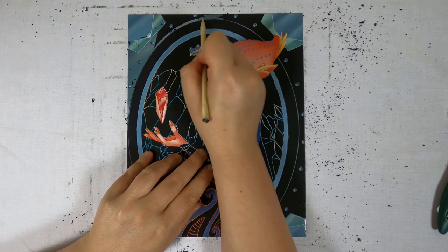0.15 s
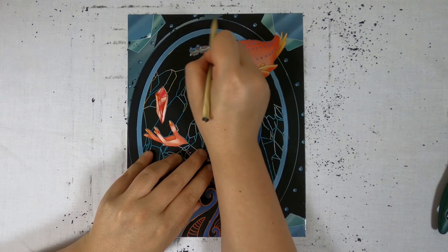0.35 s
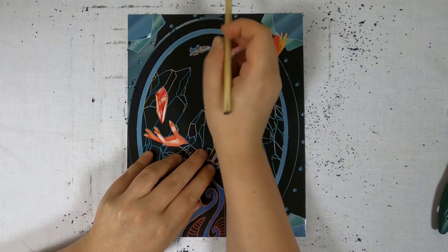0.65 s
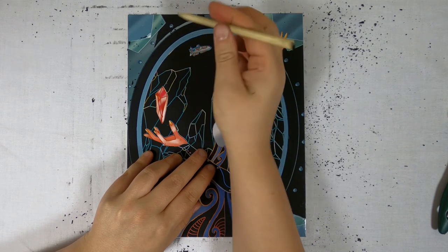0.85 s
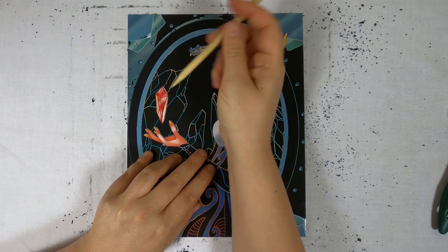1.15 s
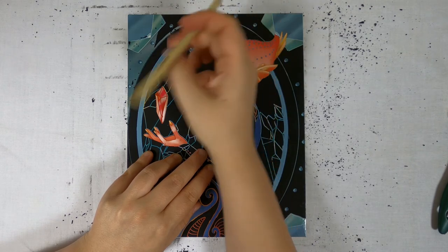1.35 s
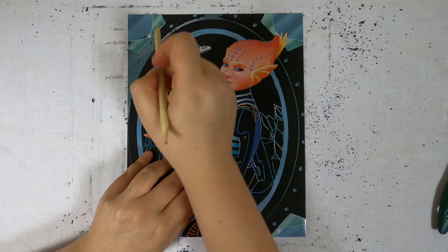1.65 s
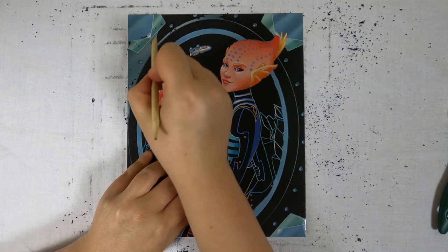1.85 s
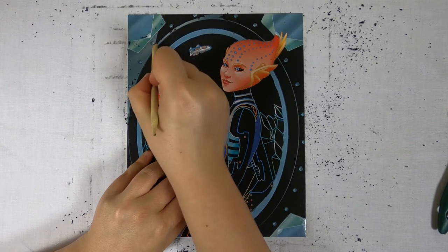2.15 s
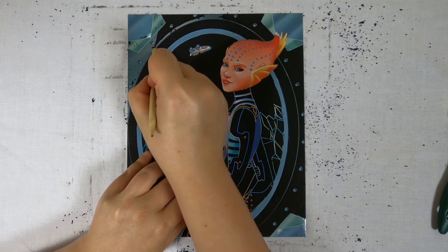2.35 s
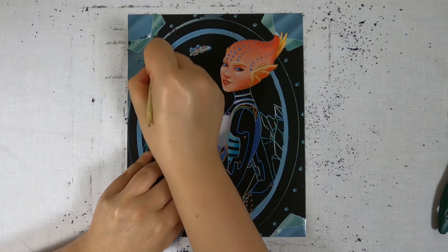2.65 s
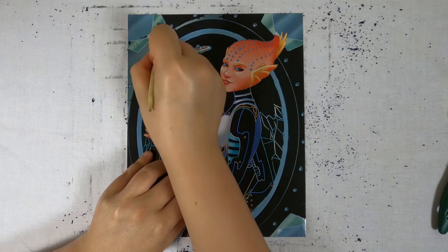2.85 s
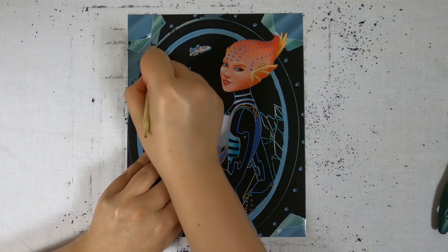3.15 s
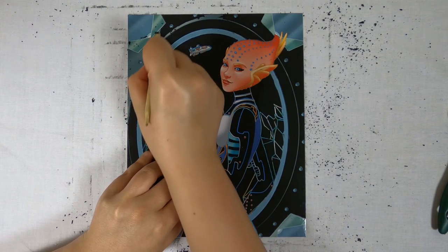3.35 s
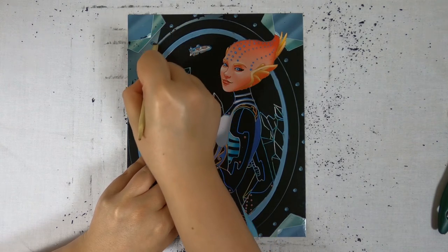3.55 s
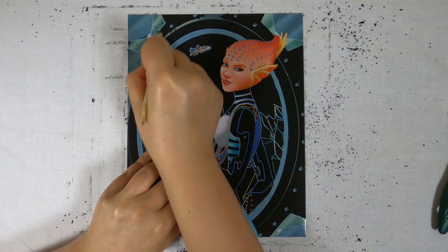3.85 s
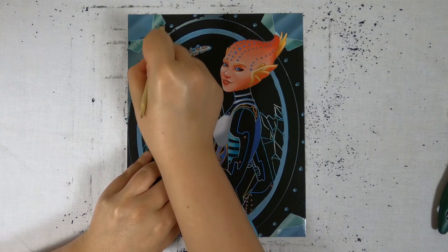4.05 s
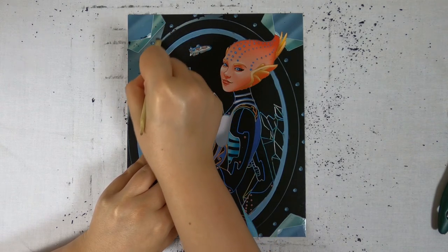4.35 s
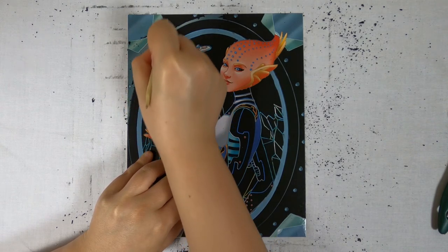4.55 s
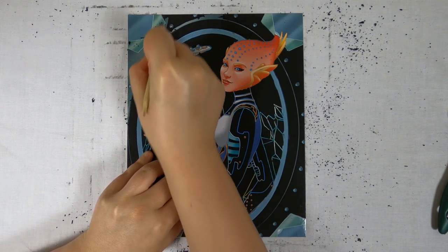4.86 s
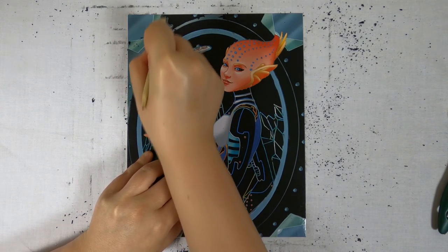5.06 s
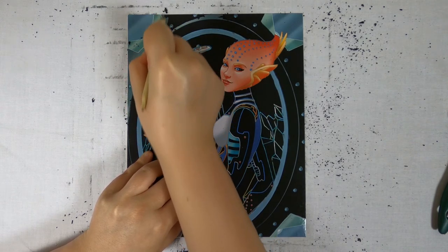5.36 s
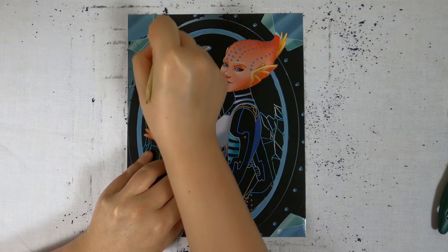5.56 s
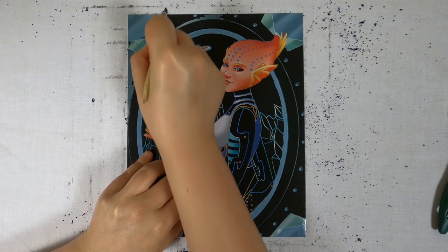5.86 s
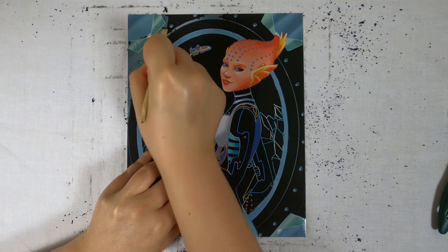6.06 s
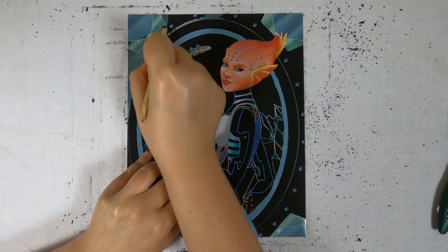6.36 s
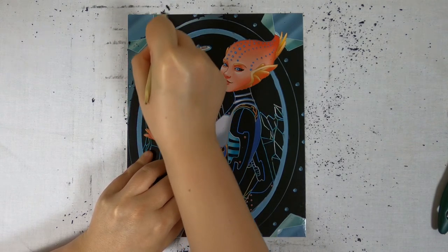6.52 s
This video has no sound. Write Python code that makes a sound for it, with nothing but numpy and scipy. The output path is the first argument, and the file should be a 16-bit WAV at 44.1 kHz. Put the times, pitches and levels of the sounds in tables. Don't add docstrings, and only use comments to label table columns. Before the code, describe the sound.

A hand scratches coating from a card on a table, heard close up in stereo with little reverberation. Weak dry scratches come first, then a near-silent pause with small slipping clicks from the fingers. Three longer, crunchy scrapes burst out with woody table rumble, separated by faint hissing slides. The rhythm then quickens into short to-and-fro scratches with several soft thuds. Faint building rumble lies beneath.

```python
import sys
import numpy as np
from scipy import signal
from scipy.fft import rfft, irfft, next_fast_len
from scipy.io import wavfile
from scipy.ndimage import uniform_filter1d

SR = 44100
rng = np.random.default_rng(int(sys.argv[2]) if len(sys.argv) > 2 else 0)


def to_wav(sig):
    pcm = np.clip(np.atleast_2d(sig), -1, 1) * 32767
    pcm = np.round(pcm).astype(np.int16)
    wavfile.write(sys.argv[1], SR, pcm.T)


def makeup_ratio(level_db):
    decades = np.asarray(level_db, float) / 20
    return 10 ** decades


N = 295029
TIME_S = np.arange(N) / SR
FIRST_PASSES = TIME_S < 1


def rms_one(x):
    return x / np.sqrt(np.mean(x ** 2) + 1e-20)


def filtered(x, order, hz, kind="low"):
    return signal.sosfilt(signal.butter(order, hz, kind, fs=SR, output="sos"), x)


def drift(rate_hz):
    r = np.exp(-80 * np.pi * rate_hz / SR)
    slow = signal.lfilter([1], [1, -2 * r, r * r], rng.standard_normal(N // 40 + 2002))[2000:]
    return np.interp(np.arange(N) / 40, np.arange(len(slow)), rms_one(slow))


def grains(per_s, spread_db):
    sizes = makeup_ratio(spread_db * np.minimum(rng.exponential(1, N), 4)) * rng.choice([-1, 1], N)
    return rms_one(sizes * (rng.random(N) < per_s / SR))


def at_hz(points, hz):
    point_hz, values = np.transpose(points)
    return np.interp(np.log(hz), np.log(point_hz), values)


def coloured(pair, spectrum, likeness, low_hz):
    size = next_fast_len(N)
    hz = np.maximum(np.fft.rfftfreq(size, 1 / SR), 1)
    gain = makeup_ratio(at_hz(spectrum, hz))
    gain = gain / np.sqrt(np.mean(gain ** 2 * (hz > low_hz)))
    alike = np.clip(at_hz(likeness, hz), 0, 1)
    mid, side = rfft(pair, size) * np.sqrt([1 + alike, 1 - alike]) * gain / np.sqrt(2)
    return irfft(np.array([mid + side, mid - side]), size)[:, :N]


def passes(start_s, end_s, start_db, end_db, rise_db_per_s, fall_db_per_s):
    t, depth_db = np.arange(0, N + 32, 32) / SR, 90
    shapes = []
    for s, e, a, b in zip(start_s, end_s, start_db, end_db):
        corners_s = [s - depth_db / rise_db_per_s, s, e + 1e-4, e + depth_db / fall_db_per_s]
        shapes.append(np.interp(t, corners_s, [a - depth_db, a, b, b - depth_db]))
    return np.interp(TIME_S, t, makeup_ratio(np.max(shapes, axis=0)))


def body(force, level, modes, wander_db, upper_db=0):
    out, power = np.zeros((2, N)), 0
    for k, (hz, width_hz, db, pan_db) in enumerate(modes):
        r, w = np.exp(-np.pi * width_hz / SR), 2 * np.pi * hz / SR
        fed_db = db + upper_db * (hz > 400) + wander_db * drift(45)
        fed = force * level * makeup_ratio(fed_db) + 1e-18
        ring = signal.lfilter([(1 - r * r) / 2, 0, (r * r - 1) / 2], [1, -2 * r * np.cos(w), r * r], fed)
        out += (-1) ** k * ring * makeup_ratio([[pan_db / 2], [-pan_db / 2]])
        power += makeup_ratio(2 * db) * width_hz * np.pi / SR
    return out / np.sqrt(power)


# pitch_hz, density_db [dB per Hz]
ROOM_AIR = [(41, -34), (70, -6), (96, -29), (144, 2), (185, 2), (599, -13), (821, -15.5), (1260, -12),
            (1510, -15.5), (3040, -24), (6130, -31), (12900, -37.5), (15500, -40)]
# pitch_hz, density_db [dB per Hz]
BUILDING_RUMBLE = [(12, -23.5), (26, 4.5), (40, -4), (60, -13.5), (100, -52), (300, -105)]
# pitch_hz, likeness [0-1]
ROOM_LIKENESS = [(25, 0.53), (60, 0.75), (130, 0.36), (300, 0.014), (15000, 0.033)]
# peak_s, level_db
RUMBLE_SWELLS = [(0.61, -71), (1.21, -71.5), (2.0, -67), (2.4, -71.5), (2.98, -66.5), (3.45, -71),
                 (4.06, -76), (4.8, -76), (5.14, -70), (5.83, -66.5), (6.32, -73), (6.69, -77)]
# pitch_hz, level_db
ELECTRONIC_WHINES = [(9400, -112), (13168, -112)]


def hush():
    air = makeup_ratio(-68) * coloured(rng.standard_normal((2, N)), ROOM_AIR, ROOM_LIKENESS, low_hz=100)
    air[0] = np.roll(air[0], shift=2)
    s, db = np.transpose(RUMBLE_SWELLS)
    swell = passes(s, s, db, db, rise_db_per_s=35, fall_db_per_s=35)
    rumble = swell * coloured(rng.standard_normal((2, N)), BUILDING_RUMBLE, ROOM_LIKENESS, low_hz=0)
    whine = sum(makeup_ratio(db + 8) * np.sin(2 * np.pi * hz * TIME_S) for hz, db in ELECTRONIC_WHINES)
    return air + rumble + whine


# start_s, hold_s, upper_mode_db, top_over_upper_db
FINGER_SLIPS = [
    (0.713, .015, -72.5, -3.5),
    (0.806, 0.023, -71, -18),
    (0.9, .01, -76, -22),
    (1.066, 0.013, -73, -10),
    (1.242, .002, -68.5, -7),
    (1.451, 0.0078, -68, -5),
    (1.519, 0.0018, -58.5, -6),
    (1.627, .03, -84, 7),
    (1.709, .008, -69, -10),
    (1.782, 0.028, -69, -7.5),
]
# start_s, end_s, start_db, end_db
SKIN_RUSTLES = [
    (0.597, 0.881, -84, -71),
    (.92, 1.064, -85, -76),
    (1.24, 1.27, -80, -84),
    (1.445, 1.528, -79, -77),
    (1.6, 1.635, -84, -75.5),
    (1.674, 1.708, -78.5, -75),
    (1.772, 1.8, -78.5, -74.5),
    (1.86, 1.993, -84.5, -86),
]
# pitch_hz, density_db [dB per Hz]
SKIN_NOISE = [(1000, -4), (2000, -3), (3500, 1), (5000, -2.5), (9000, -8), (15000, -27)]
# pitch_hz, likeness [0-1]
HAND_LIKENESS = [(1000, 0.45), (4000, 0.27), (8000, 0.2), (14000, 0.14)]
# pitch_hz, width_hz, level_db, left_over_right_db
STYLUS_UPPER_MODES = [(6110, 220, 1.1, 0), (6560, 290, 4.4, 0)]
STYLUS_TOP_MODES = [(9460, 1900, -2.3, 0), (10100, 1040, 1, 0)]


def turning():
    s, hold, upper_db, top_db = np.transpose(FINGER_SLIPS)
    rates = 454, 800
    upper_gain = passes(s, s + hold, upper_db, upper_db, *rates)
    top_gain = passes(s, s + hold, upper_db + top_db, upper_db + top_db, *rates)
    slips = grains(3800, spread_db=-5.5) * makeup_ratio(0.82 * drift(64))
    upper = body(slips, upper_gain * makeup_ratio(-3.5), STYLUS_UPPER_MODES, wander_db=4.5)
    top = body(slips, top_gain * makeup_ratio(1.5), STYLUS_TOP_MODES, wander_db=4)
    skin = coloured(np.array([slips, rng.standard_normal(N)]), SKIN_NOISE, HAND_LIKENESS, low_hz=1500)
    rustle_gain = passes(*np.transpose(SKIN_RUSTLES), rise_db_per_s=250, fall_db_per_s=230)
    return upper + top + skin * makeup_ratio(2) * rustle_gain


# start_s, end_s, start_db, end_db
TIP_SKIMS = [
    (2.428, 2.458, -69.5, -78),
    (2.984, 3.082, -66, -68),
    (3.382, 3.436, -76, -78),
    (4.178, 4.248, -81, -83),
]
# pitch_hz, width_hz, level_db, left_over_right_db
SKIMMING_MODES = [(3630, 320, 0.5, 6), (1280, 83, 3, -2)]


def skimming():
    gain = passes(*np.transpose(TIP_SKIMS), rise_db_per_s=594, fall_db_per_s=382)
    return body(grains(8000, spread_db=2), gain, SKIMMING_MODES, wander_db=1)


# start_s, end_s, start_db, end_db
HAND_SLIDES = [(0.0, .054, -81.5, -74), (0.167, 0.179, -65.5, -63.5), (0.254, 0.338, -82.5, -77),
               (0.446, 0.484, -62, -67.5), (0.574, 0.603, -76, -82), (2.518, 2.607, -76, -86),
               (2.63, 2.83, -72, -62.5), (2.966, 3.11, -67, -71.5), (3.296, 3.428, -81.5, -71),
               (3.512, 3.612, -78, -75), (3.77, 3.833, -80.5, -73), (3.897, 4.024, -60.5, -71),
               (4.143, 4.253, -74, -71.5), (4.4, 4.447, -85, -69), (4.463, 4.627, -63, -62.5),
               (4.76, 4.827, -76.5, -69), (4.9, 4.967, -76, -67.5), (4.979, 4.983, -58.5, -55),
               (5.11, 5.173, -71, -69), (5.235, 5.312, -71, -69.5), (5.419, 5.473, -72.5, -68),
               (5.526, 5.614, -76.5, -62.5), (5.72, 5.794, -73.5, -72), (5.851, 5.928, -73, -63),
               (6.032, 6.104, -70.5, -70), (6.176, 6.28, -65.5, -71), (6.346, 6.408, -70.5, -65.5),
               (6.481, 6.557, -70.5, -67.5), (6.656, 6.69, -68, -71)]
# pitch_hz, density_db [dB per Hz]
SLIDE_HISS = [(1200, -8.5), (2200, -2), (3000, -8.5), (3650, -8), (4400, -3.5), (5800, -3.5), (7500, -5),
              (9500, -8), (9800, -13.5), (13000, -17), (15600, -28)]


def sliding():
    gain = passes(*np.transpose(HAND_SLIDES), rise_db_per_s=594, fall_db_per_s=382)
    rub = np.array([grains(12000, spread_db=3.5), rng.standard_normal(N)])
    hiss = coloured(rub, SLIDE_HISS, HAND_LIKENESS, low_hz=4870) * gain * makeup_ratio(drift(36) - 1.12)
    air = filtered(hiss, 2, 9600, "high")
    hiss = hiss + air * makeup_ratio(-2) * FIRST_PASSES
    shaded = filtered(hiss[0], 1, 9000)
    return np.array([shaded * makeup_ratio(2.5), hiss[1]])


# start_s, peak_db, first_pitch_hz, settled_pitch_hz
HEEL_KNOCKS = [
    (5.0055, -23, 180, 185),
    (5.3278, -36.5, 180, 134.3),
    (5.945, -26.5, 193, 133.2),
    (6.269, -34.5, 153, 143.5),
    (6.291, -34.5, 148, 132),
    (6.557, -57, 176, 140),
]


def knocks():
    out, t = np.zeros(N + SR), np.arange(SR // 2) / SR
    settle_s = 0.0076
    for s, db, hz, end_hz in HEEL_KNOCKS:
        turns = end_hz * t + (hz - end_hz) * settle_s * (1 - np.exp(-t / settle_s))
        rise = 1 - np.exp(-t / 0.0043)
        decay = makeup_ratio(-60 * t / 0.052) + 0.18 * makeup_ratio(-60 * t / 0.26)
        thump = np.sin(2 * np.pi * turns) * decay
        push = makeup_ratio(-22.5) * np.sin(2 * np.pi * 75 * t) * makeup_ratio(-60 * t / 0.21)
        out[round(s * SR) + 130:][:len(t)] += makeup_ratio(db - 0.5) * rise * (thump + push)
    return out[:N]


# start_s, crack_db, pitch_hz, blow_over_crack_db
TIP_TICKS = [(0.162, -59, 2940, 0), (0.4356, -44.5, 2960, -8), (0.5661, -63, 3650, -11),
             (0.6534, -60, 6600, 16), (0.6755, -64, 3560, -15), (0.969, -61, 3300, -11),
             (1.32, -62, 2980, -13), (1.518, -50, 6050, -23), (2.42, -43.5, 3920, 22.5),
             (2.565, -61, 3670, 10), (2.5945, -79, 3550, -1), (3.202, -59.5, 3440, 14),
             (3.7918, -58, 3000, 14), (3.8777, -43, 3550, 8), (3.89, -48, 2950, 18), (4.433, -62, 3540, 2),
             (4.476, -49.5, 2560, 8), (4.5965, -44, 2940, 1), (4.9834, -61, 3000, -1),
             (5.601, -46.5, 3400, 8), (5.9123, -54, 2530, 8), (6.159, -55, 3600, -8),
             (6.2594, -51, 2850, -3), (6.6547, -59, 6600, 7)]


def ticks():
    out, blows, t = np.zeros(N + SR), np.zeros(N), np.arange(1500) / SR
    for s, db, hz, blow_db in TIP_TICKS:
        start = round(s * SR) + 60
        ring = np.sin(2 * np.pi * hz * t) * (makeup_ratio(-60 * t / 0.012) + 0.19 * makeup_ratio(-60 * t / 0.1))
        crack = rng.standard_normal(1500) * makeup_ratio(-60 * t / 0.02)
        out[start:][:1500] += makeup_ratio(db - 4) * (ring + 0.5 * crack)
        blows[start] = makeup_ratio(db + blow_db - 8)
    dull = filtered(out[:N], 3, [1500, 9000], "band")
    return dull + body(blows, 1, CARD_MODES + TABLE_MODES[2:], wander_db=3)


# start_s, card_peak_db, table_peak_db, tip_peak_db
RIDGE_CATCHES = [(2.568, -53, -52, -62), (2.597, -46, -45, -58), (2.605, -57, -37.5, -65),
                 (2.632, -40, -33, -45), (2.667, -34, -30, -48), (2.693, -39, -27.5, -51),
                 (2.707, -34, -32, -50), (2.717, -30, -28.5, -48), (2.752, -38, -35, -42),
                 (2.769, -28, -33.5, -34), (2.776, -30, -35, -27.5), (2.797, -28, -40, -35),
                 (2.813, -45, -43.5, -27.5), (3.203, -69, -59, -56), (3.794, -43.5, -49, -56),
                 (3.832, -53, -36, -52), (3.869, -37, -28, -48), (3.883, -48, -29, -41),
                 (3.89, -26, -45, -42), (3.909, -33, -36, -43), (3.924, -23.5, -43, -42),
                 (3.941, -28, -36, -46), (3.966, -38, -35.5, -48), (3.992, -31.5, -47, -46),
                 (4.007, -40, -41, -31), (4.026, -34, -41, -51), (4.434, -54, -46, -53),
                 (4.457, -50, -51, -55), (4.478, -30, -42, -40), (4.506, -32.5, -40, -47),
                 (4.539, -25, -37, -48), (4.555, -41, -36, -47), (4.595, -27, -39, -42),
                 (4.619, -38, -34, -41), (4.644, -33, -31, -46), (4.668, -35.5, -37.5, -56),
                 (4.979, -35.5, -45, -55), (5.003, -35, -41, -50), (5.32, -55, -62, -66),
                 (5.332, -54, -43, -66), (5.601, -43, -49, -50), (5.635, -40, -40, -54),
                 (5.914, -41, -44.5, -47), (5.935, -37, -48, -53), (6.25, -48, -38.5, -52),
                 (6.264, -39, -45, -50), (6.276, -38, -43, -54), (6.564, -45, -60, -56),
                 (6.652, -48.5, -70, -58)]
# card_db, table_db, tip_db
CATCH_FORCES = [18, 19.5, 10.5]


def catching():
    s, *peak_db = np.transpose(RIDGE_CATCHES)
    jolts = np.zeros((3, N))
    jolts[:, np.round(s * SR).astype(int)] = makeup_ratio(np.array(peak_db) + np.array(CATCH_FORCES)[:, None])
    return jolts


# start_s, card_ring_db, boom_over_ring_db, bite_over_ring_db, upper_table_modes_db
PRESSED_STROKES = [
    [(2.51, -83.5, 12.5, -5, -3), (2.612, -55, 12, -17, -5), (2.654, -42.5, 7, -3.5, -6.5),
     (2.714, -43.5, 7, -4.5, -1), (2.765, -37.5, 1.5, -3, -2), (2.78, -39, -2.5, -9, 6.5),
     (2.815, -36.5, -10, -3.5, 5.5), (2.942, -90.5, 12.5, -10, -8)],
    [(3.75, -89, 9, -8, -4), (3.798, -51.5, 9, -6, 1), (3.864, -54.5, 8, -6, -5),
     (3.888, -32.5, -6, -9.5, 5.5), (3.914, -31.5, -15, -8, 0.1), (3.952, -35.5, 1, -11.5, -2),
     (3.964, -46, 4.5, -3, 8), (4.018, -39, 2.5, -6.5, 5), (4.09, -78.5, 17.5, -13, 0)],
    [(4.402, -99, 9, -11, -4), (4.43, -58, 12, -6, -12), (4.464, -49.5, 2.5, -2, 8),
     (4.492, -39.5, -11.5, -3.5, 8.5), (4.56, -38, -12, -4, 10.5), (4.608, -36.5, -11.5, -4.5, 2),
     (4.636, -41.5, -3, -2.5, 1.5), (4.668, -48, 4.5, -9.5, -4), (4.75, -88.5, 22.5, -13, -7)],
]


def long_strokes():
    s, *columns = np.transpose(np.concatenate(PRESSED_STROKES))
    down = sum((TIME_S >= rows[0][0]) & (TIME_S <= rows[-1][0]) for rows in PRESSED_STROKES) > 0
    return uniform_filter1d(down * 1., size=221), [np.interp(TIME_S, s, c) for c in columns]


# start_s, hold_s, card_ring_db, boom_over_ring_db, bite_over_ring_db
TIP_DIGS = [
    (0.162, 0.017, -55.5, -14, -4),
    (0.434, 0.037, -61.5, -8, 6),
    (4.98, 0.019, -41, -6, -3.5),
    (5.322, 0.0066, -59.5, -1.5, -14),
    (5.612, 0.016, -44.5, -2.5, -5),
    (5.913, 0.019, -42.5, -7, -7.5),
    (6.256, 0.0027, -46.5, -1, -1.5),
    (6.648, .002, -61.5, -30, -18),
]
# start_s, end_s, start_db, end_db, lean_to_table_db
TIP_GRAZES = [(0.0, 0.064, -73.5, -76, 12), (0.262, 0.307, -84.5, -76, 16), (2.439, 2.514, -72, -94, 14),
              (2.99, 3.14, -101, -79.5, -22), (3.187, 3.18, -84, -68, -9), (3.32, 3.417, -77.5, -69.5, 4.5),
              (3.558, 3.573, -84, -79, -6), (4.07, 4.18, -61.5, -94, 7.5), (4.754, 4.811, -75.5, -75.5, 6),
              (4.907, 4.96, -67.5, -59, 4.5), (5.087, 5.15, -64.5, -71, 3), (5.214, 5.326, -77, -62, 5),
              (5.364, 5.46, -74, -74.5, 2.5), (5.557, 5.582, -65, -61.5, 5.5), (5.72, 5.812, -69.5, -90, 7),
              (5.824, 5.9, -78.5, -63, 7), (5.998, 6.114, -62.5, -80, 4.5),
              (6.174, 6.248, -64.5, -60.5, 0.5), (6.325, 6.466, -60, -88, 6),
              (6.468, 6.564, -75.5, -59.5, -0.5), (6.614, 6.644, -78, -78, 10)]


def contact():
    touching, (ring_db, boom_db, bite_db, upper_db) = long_strokes()
    long = touching * makeup_ratio([ring_db, ring_db + boom_db, ring_db + bite_db])
    s, hold, db, boom, bite = np.transpose(TIP_DIGS)
    rates = 1511, 360
    digs = [passes(s, s + hold, db, db, *rates),
            passes(s, s + hold + 0.022, db + boom + 1.5, db + boom, *rates),
            passes(s, s + hold, db + bite, db + bite, *rates)]
    s, end, db, end_db, lean = np.transpose(TIP_GRAZES)
    graze_bite_db = -1.5 - 0.37 * lean
    grazes = [passes(s, end, db + more, end_db + more, rise_db_per_s=503, fall_db_per_s=408)
              for more in (0, lean, graze_bite_db)]
    return np.maximum(long, np.maximum(digs, grazes)), upper_db * touching


# pitch_hz, width_hz, level_db, left_over_right_db
TABLE_MODES = [(139, 33, -6.5, 3), (179.6, 37.4, -1.5, -1), (300.2, 22.3, 3.5, 2),
               (354.8, 35.5, -1.5, -3.5), (441.9, 16.3, 1, 0.5), (560.6, 16.5, -7, 5.5),
               (317, 310, -20, -8)]
CARD_MODES = [(649.6, 32, -13.5, 2), (728.4, 60, -11.5, 0.84), (805, 14, -10, 2.3), (929, 24, 2, 3),
              (967, 20, -4, 3), (1373, 30, -7, 2), (1100, 900, -26, 2), (1038.6, 35.6, -5, 1),
              (1203, 133, -12.5, 0.59), (1240, 29, -8, 3), (1657, 23, -13, 1.2)]
PRESSED_CARD_MODES = [(560, 110, -6, 1.7), (716, 160, -5, 2), (938, 150, 2.5, 3), (1093, 103, 3.5, 1.4),
                      (1322, 180, 1.5, 3.4), (1750, 340, -6.5, 1.5)]
CARD_EDGE_MODES = [(613, 240, 2.5, 0), (915, 130, -17, 0), (1165, 220, 9.5, 0), (1590, 127, 13, 0)]
TIP_MODES = [(1840, 69, -6, 10), (2028, 72, -6, 1.2), (2373, 95, -1.5, 3.5), (2940, 36, -5.5, 11),
             (3620, 340, -7, 2), (2900, 2400, -14.5, 2), (4740, 160, -13.5, 1), (5570, 300, -19.5, 1.8),
             (6070, 1440, -20, 0.96)]
TIP_EDGE_MODES = [(2130, 240, 3.5, 0), (2400, 120, 7.5, 0), (3000, 1200, -2.5, 0)]


def scraping():
    (level, boom, bite), upper_db = contact()
    to_card, to_table, to_tip = catching()
    chips = rms_one(grains(4200, spread_db=3) * makeup_ratio(1.4 * drift(120)))
    bite = bite * makeup_ratio(-2.5)
    inner = ~FIRST_PASSES
    force = chips * level * inner + to_card
    damped = 0.53 * ((TIME_S > 4.74) & (TIME_S < 6.62))
    card = body(force, np.sqrt(1 - damped), CARD_MODES, wander_db=1.62)
    card += body(force, np.sqrt(damped), PRESSED_CARD_MODES, wander_db=0.5)
    card += body(chips, level * FIRST_PASSES, CARD_EDGE_MODES, wander_db=2.5)
    table_force = chips * boom * makeup_ratio(-0.3) + to_table
    table = body(table_force, 0.96, TABLE_MODES, wander_db=1.1, upper_db=upper_db)
    tip = body(chips * bite * inner + to_tip, 0.96, TIP_MODES, wander_db=1.86)
    tip += body(chips, bite * FIRST_PASSES, TIP_EDGE_MODES, wander_db=-2)
    return card + table + tip


def walls(x):
    t = np.arange(SR // 4) / SR
    tail = rng.standard_normal((2, len(t))) * makeup_ratio(-60 * t / 0.18) * (t > 0.004)
    tail = filtered(tail, 2, [1150, 5000], "band")
    return signal.fftconvolve(x, tail / np.sqrt(np.sum(tail ** 2) / 2), axes=1)[:, :N]


def scene():
    low = filtered(scraping(), 9, 115, "high") + knocks()
    low = filtered(low, 3, 7500)
    low[0] = np.roll(low[0], shift=2)
    hand = low + sliding() + turning() * makeup_ratio([[-1.5], [1.5]]) + ticks()
    return hand + makeup_ratio(-14) * walls(hand) + hush() + skimming()


def band_limit(x):
    return signal.sosfilt(signal.butter(12, 15630, fs=SR, output="sos"), x)


def record(dry):
    cut = signal.sosfilt(signal.cheby2(16, 70, 16100, fs=SR, output="sos"), dry)
    return band_limit(cut)


dry = scene()
out = record(dry)
to_wav(out)
```